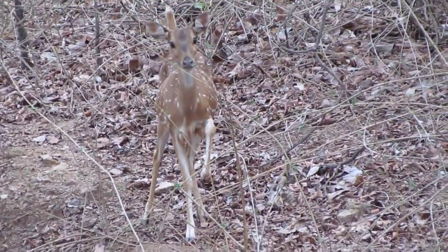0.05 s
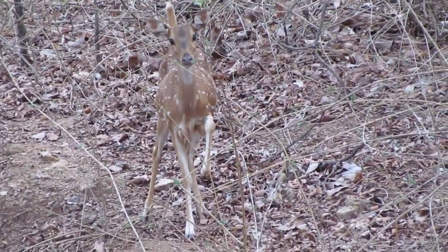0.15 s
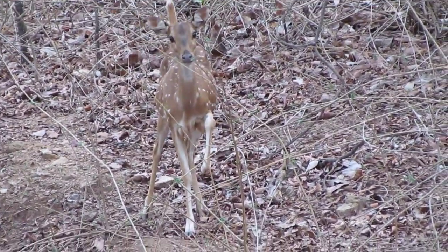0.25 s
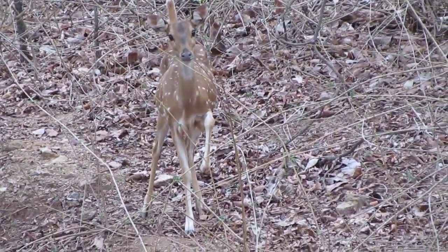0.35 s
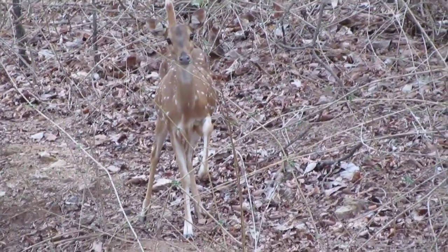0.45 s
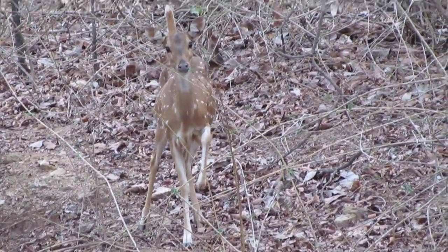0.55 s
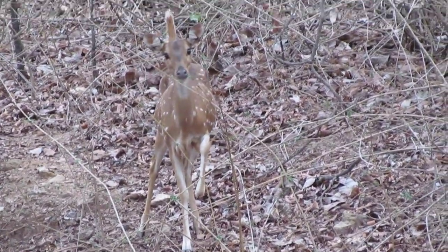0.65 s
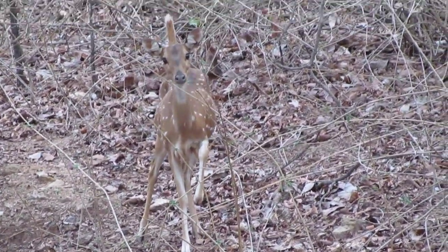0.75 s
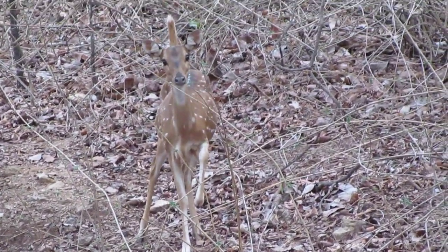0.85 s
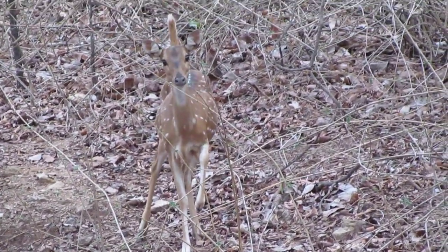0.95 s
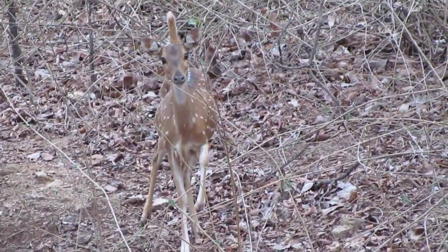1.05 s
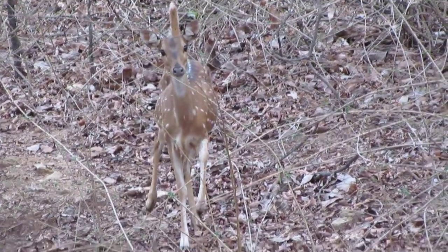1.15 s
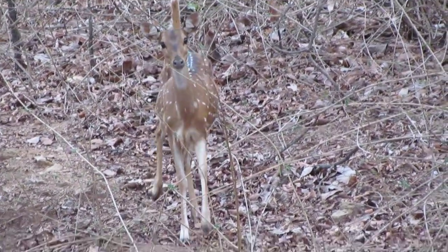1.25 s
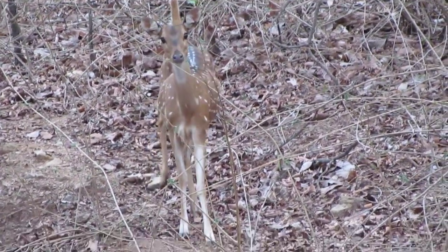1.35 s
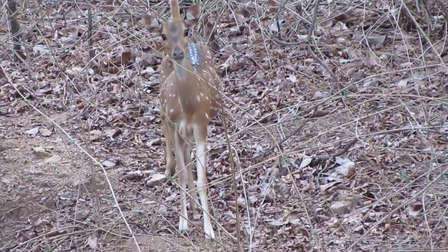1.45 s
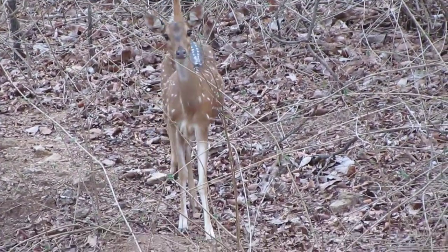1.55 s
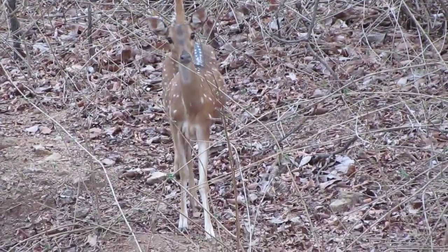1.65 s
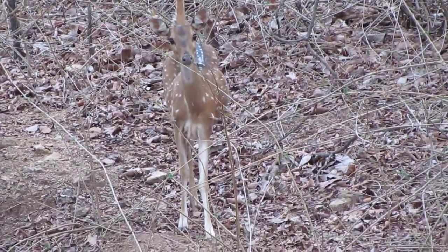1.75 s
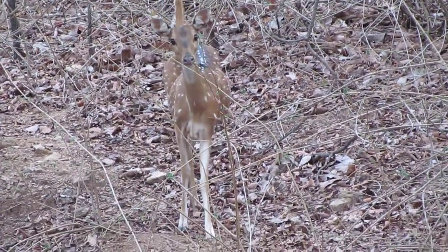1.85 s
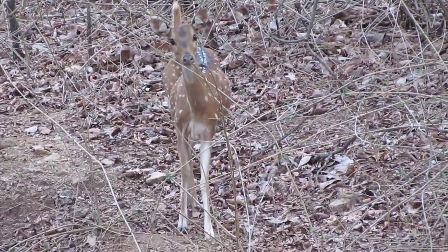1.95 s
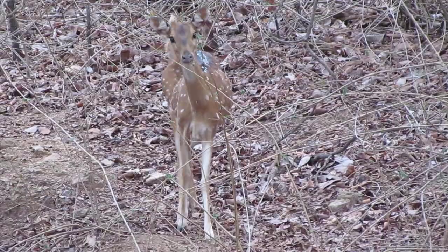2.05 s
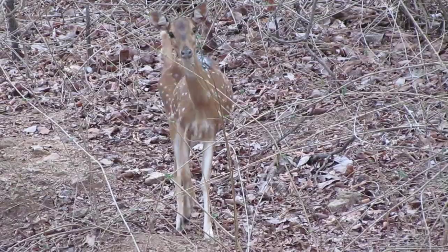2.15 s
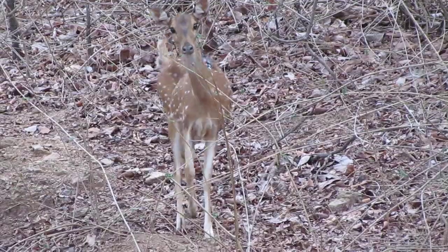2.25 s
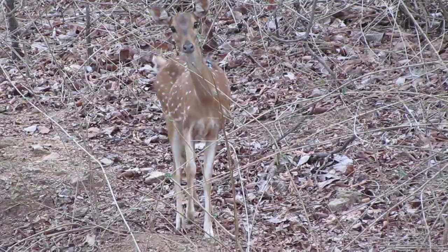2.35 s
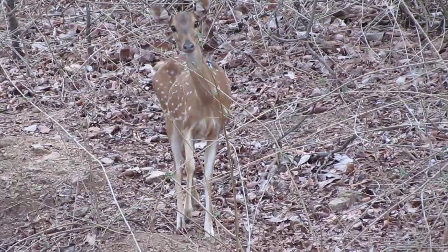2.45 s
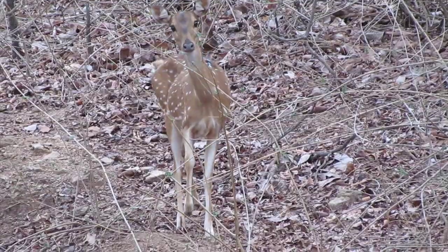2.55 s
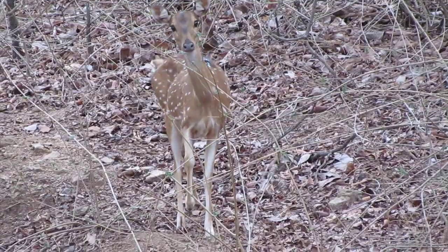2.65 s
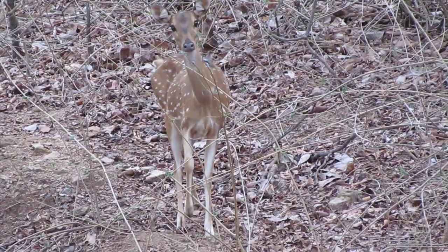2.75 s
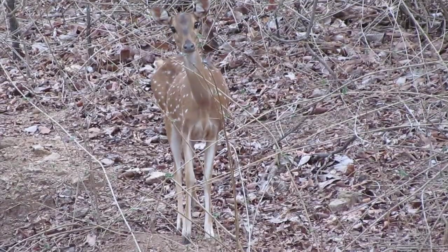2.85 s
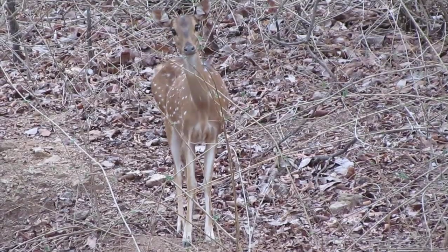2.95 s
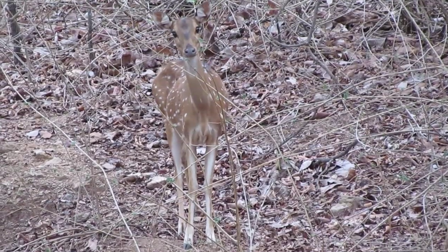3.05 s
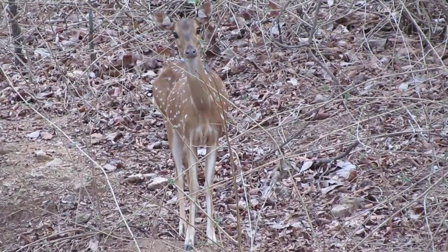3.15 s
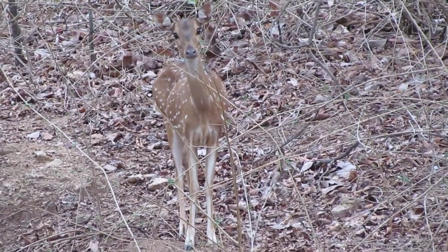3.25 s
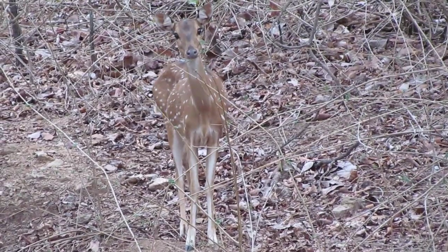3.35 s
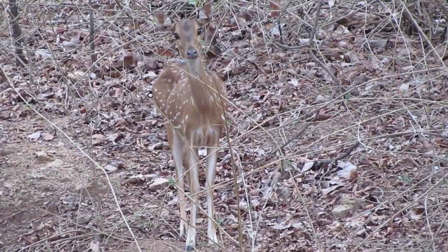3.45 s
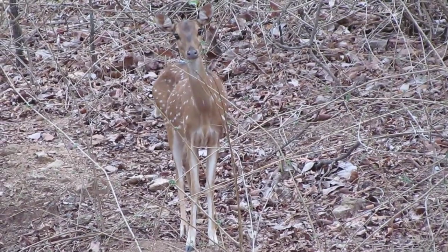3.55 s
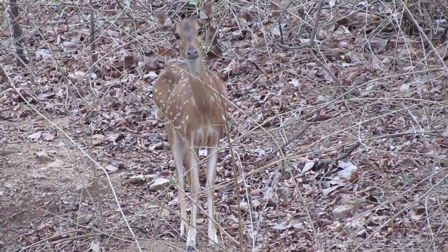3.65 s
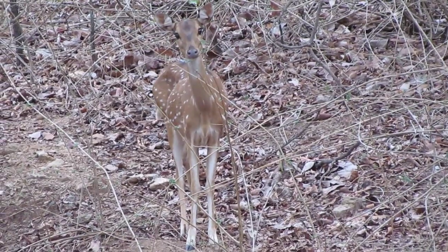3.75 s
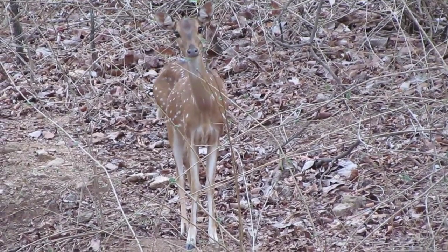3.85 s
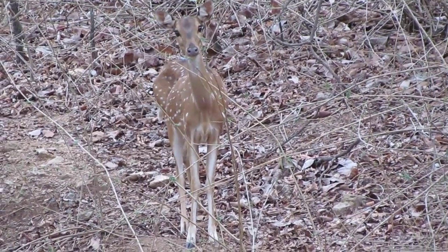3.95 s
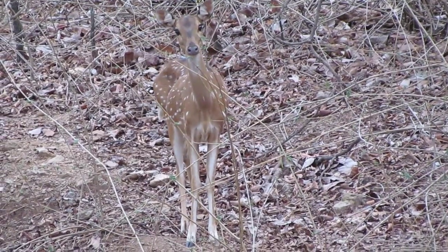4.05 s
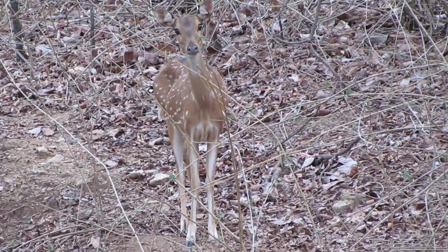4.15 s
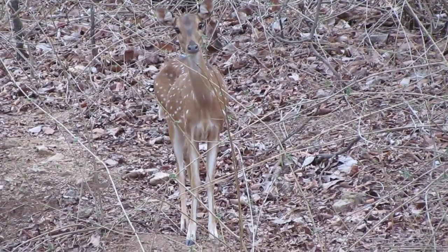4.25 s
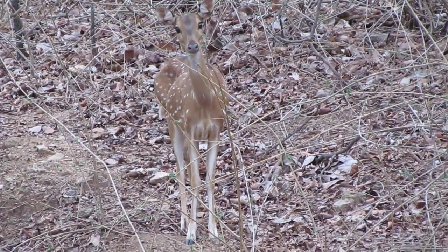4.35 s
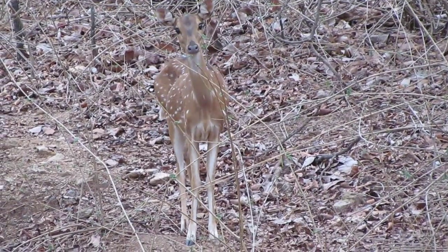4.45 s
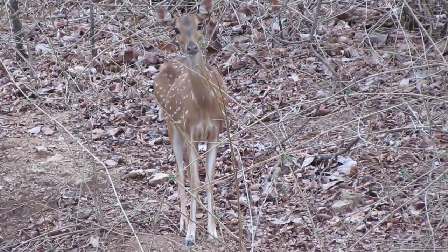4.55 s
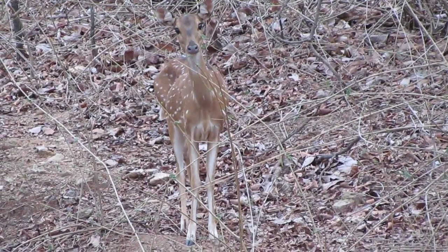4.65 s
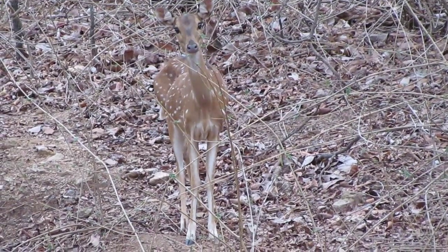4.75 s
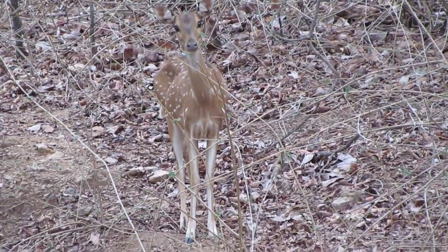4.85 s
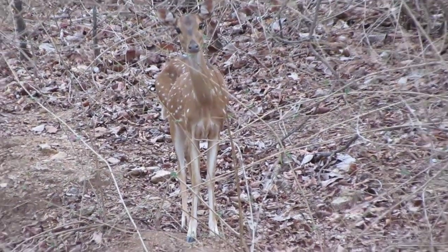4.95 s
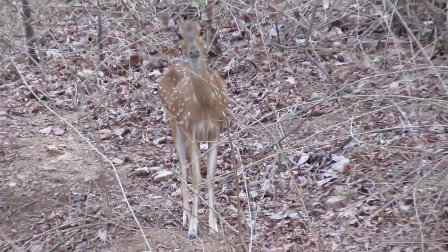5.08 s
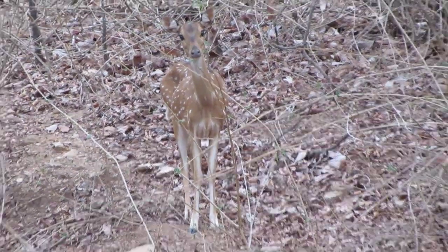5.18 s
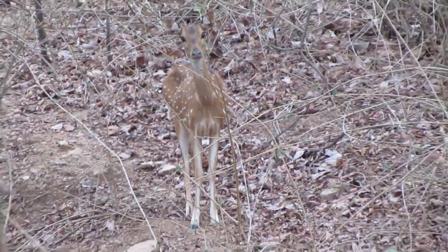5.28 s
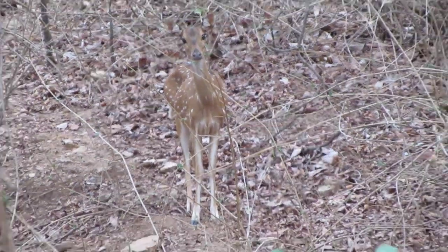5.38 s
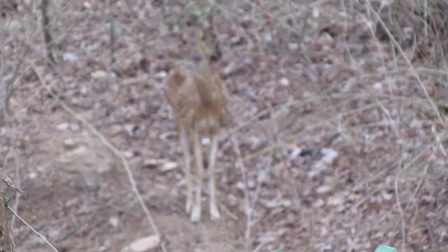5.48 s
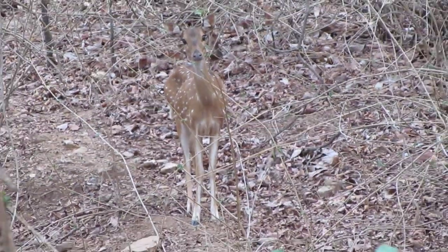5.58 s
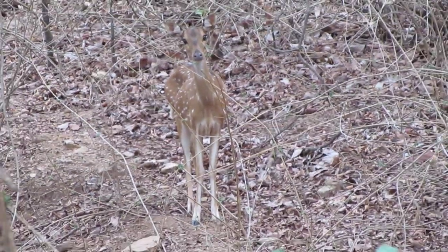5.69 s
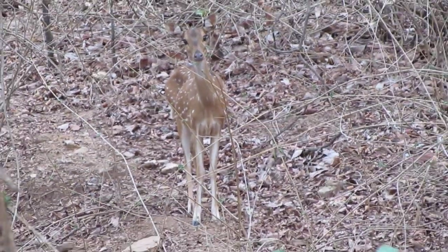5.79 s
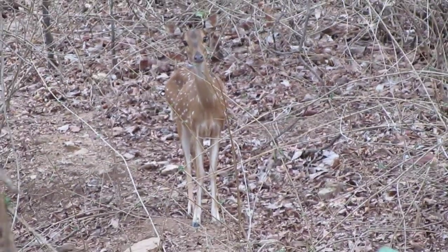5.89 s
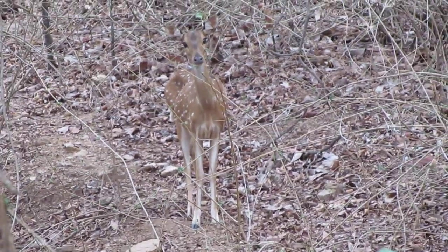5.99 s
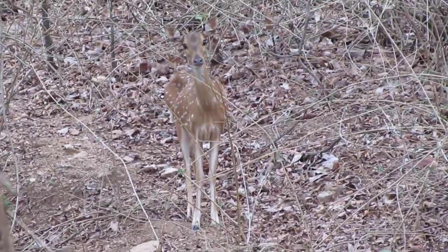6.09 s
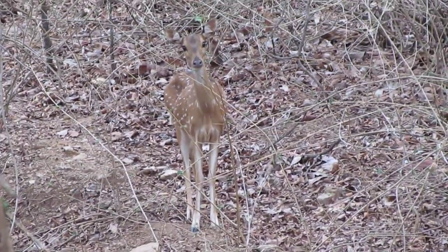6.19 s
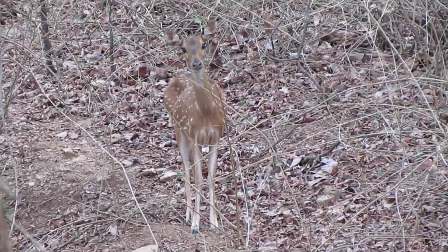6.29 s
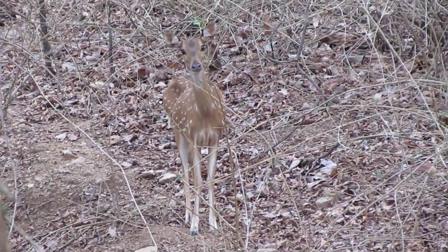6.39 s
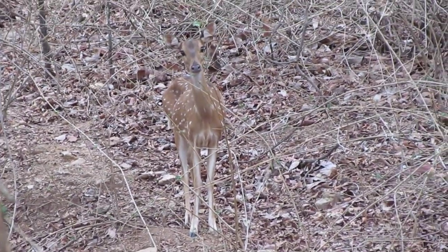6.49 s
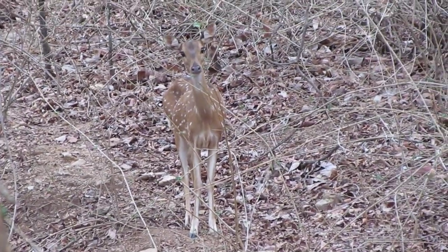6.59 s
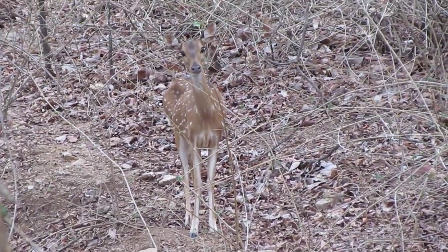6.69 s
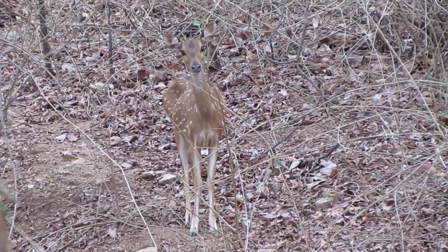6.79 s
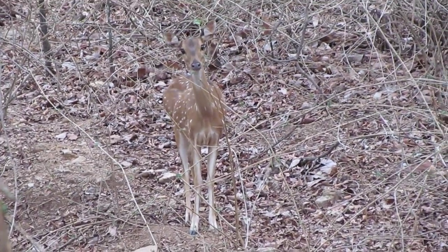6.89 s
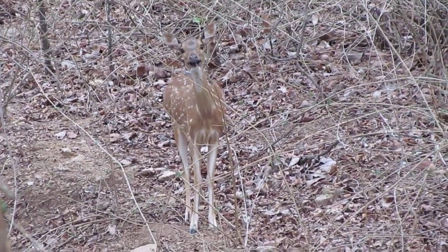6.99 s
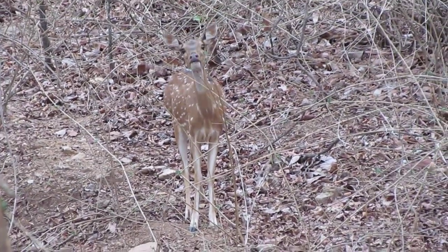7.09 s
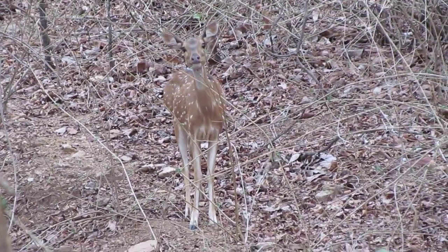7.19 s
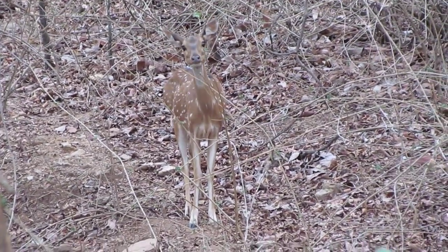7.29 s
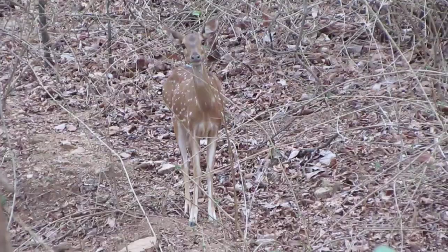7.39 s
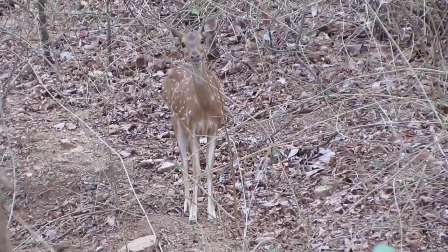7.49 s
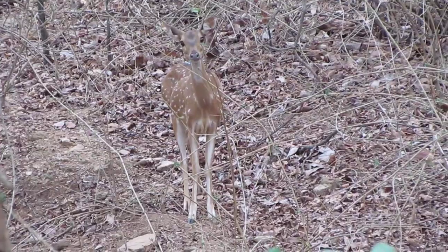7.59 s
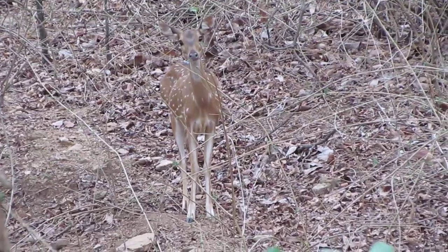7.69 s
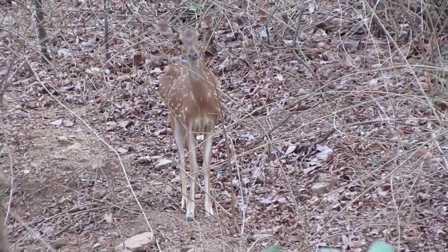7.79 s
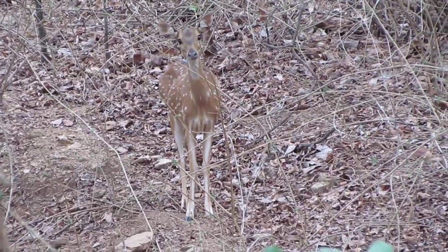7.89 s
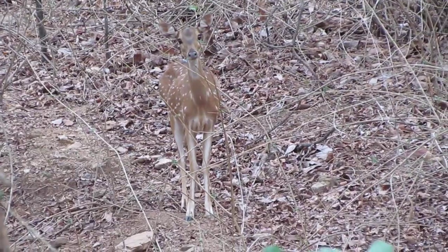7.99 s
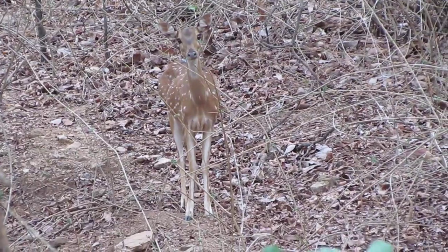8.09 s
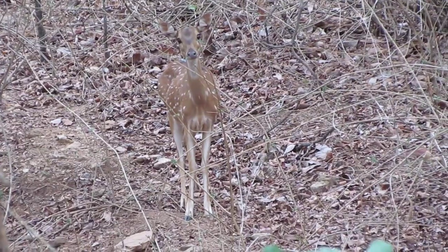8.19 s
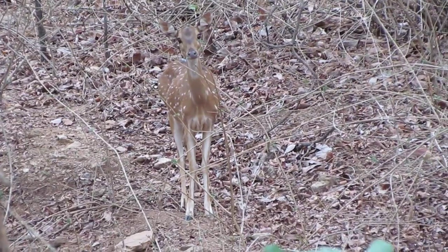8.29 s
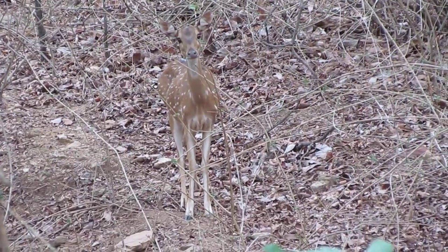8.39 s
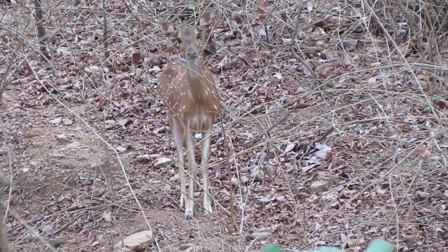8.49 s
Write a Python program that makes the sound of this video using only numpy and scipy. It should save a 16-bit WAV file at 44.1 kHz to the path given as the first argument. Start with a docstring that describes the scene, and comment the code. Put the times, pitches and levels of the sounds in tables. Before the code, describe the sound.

A soft, steady forest hush runs for about eight and a half seconds. A cricket chirps evenly about twice a second throughout, while a thin insect buzz comes and goes. A higher, faint bush cricket shuffles quickly from about 1.5 to 7 seconds. Distant birds give short gliding whistles between 1 and 3 seconds, with a few tiny dry leaf ticks. Just after 4 seconds come two soft, low bumps on the microphone, to the left. A hand knocks on its housing at about 4.8, 5.4 and 5.6 seconds, with a light grainy rub between. At about 7.1 seconds a deer gives one sharp, high alarm yelp, the loudest sound, very brief, turning hoarse as its pitch drops. The trees echo it for about a second. Bird chirps pick up around the call and continue until just after 8 seconds, over the insects.

```python
"""Deer alarm in a dry forest

A spotted deer gives one sharp yelp that breaks hoarse, and the trees throw it back for a second.
A cricket chirps twice a second, a bush cricket shuffles higher up, a thin insect buzz comes and goes,
far birds whistle. Close by, a hand knocks and rubs on a microphone's housing; a few dry leaves tick."""
import sys
import numpy as np
from scipy import signal
from scipy.fft import rfft, irfft
from scipy.io import wavfile

SR = 44100
rng = np.random.default_rng(int(sys.argv[2]) if len(sys.argv) > 2 else 0)


def log_audio(samples):
    """Write samples as a 16-bit WAV file to the path given in sys.argv[1]."""
    # one column per channel
    frames = np.atleast_2d(samples).T
    # limit to full scale, then quantise
    limited = np.clip(frames, -1, 1)
    pcm = np.round(limited * 32767).astype(np.int16)
    wavfile.write(sys.argv[1], SR, pcm)


N = 376173
TIME = np.arange(N) / SR


def deer():
    """Vocal folds squeal in a clean arch, then the voice breaks and turns hoarse as the pitch sags."""
    # The throat's response to overtones. Each row: frequency in Hz, level in dB against the octave.
    throat = [(2300, -24), (3400, -29.5), (4500, -37), (5700, -38), (6800, -40), (9000, -32), (11000, -29),
              (13000, -45)]
    # The colour of air rasping in the throat. Each row: frequency in Hz, relative level in dB.
    rasp_colour = [(500, -14), (1000, 4), (1900, 10), (3000, 3), (4200, -4.5), (5800, 8), (7800, -3),
                   (9000, 6), (11300, 9.5), (13000, -9.5), (15000, -30.5)]
    start_s, break_s, end_s = 7.068, 7.128, 7.21
    plateau_hz, scoop_hz, scoop_s, sag_hz_per_s = 1135, 160, .011, 4800
    swell_db_per_s, fade_db_per_s, octave_fade_db_per_s = 270, 155, 237
    until_break = np.maximum(break_s - TIME, 0)
    broken_s = np.minimum(since(break_s), end_s - break_s)
    hz = plateau_hz - scoop_hz * np.exp(-since(start_s) / scoop_s) - sag_hz_per_s * broken_s
    hoarse = np.minimum(17 * broken_s, .77)
    fundamental_gain = from_db(-21 - swell_db_per_s * until_break - fade_db_per_s * broken_s)
    fundamental_gain *= gate(start_s, end_s, attack=.0045, release=.028)
    octave_gain = from_db(-20.5 - octave_fade_db_per_s * broken_s)
    octave_gain *= gate(start_s, end_s, attack=.027, release=.02) ** 2
    # Slack folds beat unevenly, in both period and strength.
    hz *= 1 + (.003 + .07 * hoarse) * wander(TIME, 900)
    flutter = from_db(4 * hoarse * wander(TIME, 260) - 1.5 * hoarse)
    fundamental = flutter * fundamental_gain * tone(hz)
    octave = flutter * octave_gain * tone(2 * hz + 170 * hoarse * wander(TIME, 1200))
    overtones = octave_gain * sum(from_db(curve(throat, k * hz)) * tone(k * hz) for k in range(3, 12))
    # Air escapes once in each cycle of the folds.
    rasp_gain = from_db(-43 + 2.3 * wander(TIME, 370)) * gate(start_s, end_s, attack=.022, release=.06)
    rasp = rasp_gain * noise(rasp_colour) * (1 + .47 * tone(hz))
    whistle = deer_whistle(hz, start_s=7.077, end_s=break_s + .006)
    edge = (overtones + whistle) * (1 + .36 * wander(TIME, 400)) + rasp
    direct = pan(fundamental, 1) + pan(octave + edge, -6)
    # The squeal is beamed straight ahead; the lower, hoarse end spreads wider among the trees.
    spread = (fundamental + octave) * from_db(-1.5 + 3 * hoarse)
    echoes = forest(spread, gap=.023, near_db=-5, near_t60=.46,
                    far_db=-11, far_t60=2.68, dull_hz=3500, alike=.5)
    bright_echoes = forest(edge, gap=.006, near_db=-9, near_t60=.22,
                           far_db=-11, far_t60=.6, dull_hz=6000, alike=.1)
    return direct + echoes + bright_echoes


def deer_whistle(fold_hz, start_s, end_s):
    """A thin second voice drops onto its pitch; the folds chop it, adding a sideband on either side."""
    settled_hz, drop_hz, drop_s = 8790, 850, .0129
    hz = settled_hz + drop_hz * np.exp(-since(start_s) / drop_s)
    gain = from_db(-35.5) * gate(start_s, end_s, attack=.009, release=.011)
    return gain * tone(hz + 70 * wander(TIME, 720)) * (1 + .41 * tone(fold_hz))


def cricket():
    """Each wing stroke is a short falling tone; the strokes quicken and fall farther through a chirp."""
    # The chirps. Each row: start in seconds, relative level in dB.
    chirps = [(.151, -45), (.689, -44.5), (1.226, -45.5), (1.765, -45), (2.335, -44.5), (2.838, -44),
              (3.348, -44), (3.893, -45), (4.389, -43.5), (4.919, -43.5), (5.462, -44.5), (6.033, -42.5),
              (6.615, -44.5), (7.186, -45), (7.721, -44.5), (8.241, -46)]
    chirp_s, swell_s, release_s = .26, .032, .055
    t = TIME[:int(chirp_s * SR)]
    strokes_per_s = np.interp(t, [.09, .12], [66, 107])
    fall_hz = np.interp(t, [0, .12], [560, 1050])
    wing_hz = 4700 + 550 * t
    swell_db = -14 * (np.exp(-t / swell_s) + np.maximum(1 - (chirp_s - t) / release_s, 0))
    song = np.zeros(N)
    for start, db in chirps:
        stroke = np.cumsum(strokes_per_s * (1 + .06 * wander(t, 41.8))) / SR % 1
        grip = np.sin(np.pi * stroke) ** 2.2
        # The teeth of the file catch unevenly.
        hz = wing_hz + fall_hz * (.5 - stroke) + 120 * wander(t, 900)
        catch_db = 2.8 + 1.8 * wander(t, 100) + 2.1 * wander(t, 600)
        add(song, start, from_db(db + swell_db + catch_db) * grip * tone(hz))
    song = band(song, 4400, 5300)  # the wing's resonance
    echoes = forest(song, gap=.002, near_db=-3.5, near_t60=.08,
                    far_db=-7, far_t60=.55, dull_hz=9000, alike=.1)
    return pan(song, 3) + echoes


def birds():
    """Gliding whistles, some harsh, heard through much wood."""
    # The bird notes. Each row: start in seconds, length in seconds, first and last pitch in Hz,
    # level in dB, left over right in dB, roughness from 0 to 1.
    notes = [(1.026, .12, 1900, 1580, -59, 0, .65), (1.253, 0.062, 3120, 2950, -45, 15, .25),
             (1.268, .09, 2650, 2700, -55, 12, 0.43), (1.285, .11, 2950, 2944, -41, 4, .12),
             (1.464, 0.091, 2100, 2457, -45.5, 6, 0.64), (1.538, .1, 2350, 2430, -44, 0, 0.59),
             (1.77, 0.14, 2280, 2450, -49.5, 2.5, 0.74), (1.87, .085, 2870, 3010, -43, 4, 0.18),
             (2.093, .07, 1880, 1884, -53.5, -4, .18), (2.171, 0.07, 2300, 2064, -49, 5, .4),
             (2.225, 0.064, 1810, 1670, -52.5, 6.5, 0.27), (2.28, .14, 2000, 2130, -54, 2.5, 0.65),
             (2.89, .138, 1797, 1730, -45.5, -6, 0.09), (3.294, .12, 2260, 1650, -62, -2.5, .7),
             (4.448, .092, 2950, 2600, -60.5, 7, .7), (4.593, .063, 2692, 2545, -58, 5, .35),
             (4.805, 0.09, 3000, 2630, -58.5, 8.5, 0.27), (4.987, 0.098, 2860, 2820, -60, 11, 0.41),
             (6.876, .17, 2646, 2890, -48.5, 4, .2), (7.102, .094, 3000, 2900, -43, 14, .15),
             (7.193, 0.052, 2920, 2920, -41, -2, 0.12), (7.32, .07, 2400, 2520, -44, 8, .5),
             (7.37, .084, 2750, 3150, -53, 7, 0.75), (7.391, 0.049, 2360, 2520, -42, 1, .38),
             (7.459, .11, 1705, 1800, -44.5, -5, .13), (7.614, .037, 2650, 2696, -40, 7, 0.16),
             (7.82, 0.05, 1494, 2600, -45, -3.5, .47), (7.861, .05, 2550, 2296, -43, 3, 0.54),
             (7.939, .054, 2150, 1857, -46, -4, .6), (8.001, .028, 2570, 2670, -38.5, 10, 0.07),
             (8.04, 0.051, 2370, 2327, -39, -11, 0.11), (8.09, 0.065, 2283, 2140, -47.5, -3, .19)]
    direct, song = np.zeros((2, N)), np.zeros(N)
    for start, length, first_hz, last_hz, db, side_db, rough in notes + far_notes():
        t = TIME[:int(length * SR)]
        progress = t / t[-1]
        glide = last_hz + (first_hz - last_hz) * (1 - progress) ** 1.8  # fast at first, then settling
        hz = glide * (1 + .13 * rough * wander(t, 650))
        swell = np.abs(np.sin(np.pi * progress)) ** .8 * from_db(4 * rough * wander(t, 180))
        note = from_db(db) * swell * tone(hz)
        add(direct, start, pan(note, side_db))
        add(song, start, note)
    return direct + forest(song, gap=.012, near_db=-6, near_t60=.27,
                           far_db=-3, far_t60=1.65, dull_hz=5030, alike=.2)


def far_notes(per_s=2.5, low_hz=2200, high_hz=3403, length_s=.13, db=-65, side_db=5, rough=.6):
    """Rows of faint falling notes for farther birds, at random times and pitches."""
    notes = rng.uniform([0, low_hz], [N / SR, high_hz], (int(per_s * N / SR), 2))
    return [(start, length_s, hz, .87 * hz, db, side_db, rough) for start, hz in notes]


def hand_knocks():
    """Each knock cracks and rings the housing, favouring the modes near the pitch of the touch."""
    # The knocks. Each row: start in seconds, relative level in dB, ring time multiplier,
    # frequency most excited by the touch in Hz.
    knocks = [(4.8471, -28.5, 0.91, 700), (5.429, -24, 0.71, 1600), (5.59, -22.5, 1.57, 1050)]
    # The housing's modes. Each row: frequency in Hz, relative level in dB, seconds to fall 60 dB.
    modes = [(146, -7.5, .05), (281, -5, .06), (467, -9.5, 0.088), (690, -13.5, 0.023), (995, -6, 0.023),
             (1240, -8.5, .03), (1650, -8.5, 0.024), (1904, -7, 0.025), (2200, -8.5, 0.026),
             (2840, -11.5, 0.017)]
    out, t = np.zeros(N), TIME[:SR // 5]
    attack = 1 - np.exp(-t / .00049)
    for start, db, ring, touch_hz in knocks:
        body = np.zeros(len(t))
        for k, (hz, mode_db, t60) in enumerate(modes):
            struck_db = mode_db - 3.7 * abs(np.log2(hz / touch_hz))
            body += (-1) ** k * from_db(struck_db - 60 * t / (t60 * ring)) * np.sin(2 * np.pi * hz * t)
        crack = band(rng.standard_normal(len(t)), 900, 8000) * from_db(-7 - 60 * t / .018)
        add(out, start, from_db(db) * (body + crack) * attack)
    return pan(out, .61)


def hand_bumps():
    """Soft bumps rock the housing: low thuds, well to the left."""
    # The bumps. Each row: centre in seconds, frequency in Hz, level in dB, half-width in seconds.
    bumps = [(.345, 53.6, -49.5, 0.016), (.83, 45, -46, 0.019), (.885, 60, -45, 0.011),
             (4.224, 81, -34, 0.0082), (4.312, 66.2, -32.5, 0.0058), (5.77, 49, -47, .025)]
    thuds = np.zeros(N)
    for centre, hz, db, width in bumps:
        t = TIME - centre
        thuds += from_db(db) * np.exp(-(t / width) ** 2) * np.cos(2 * np.pi * hz * t)
    return pan(thuds, 14.4)


def hand_rub():
    """The hand slides over the housing with a grainy hiss."""
    # The rub's swell. Each row: time in seconds, level in dB.
    swell = [(4.7, -80), (4.87, -61), (5.18, -55), (5.26, -49.5), (5.39, -51.5), (5.46, -58), (5.62, -59),
             (5.85, -80)]
    # The rub's colour. Each row: frequency in Hz, relative level in dB.
    colour = [(150, -2), (400, 4), (800, -3.5), (1400, -5.5), (2200, -8.5), (4000, -9), (7000, -13),
              (12000, -20.5), (15000, -35)]
    grain_db = 1.3 * wander(TIME, 70) + 1.8 * wander(TIME, 700)
    return pan(from_db(curve(swell, TIME) + grain_db) * noise(colour), .61)


def leaves():
    """Dry leaves snap with tiny bright ticks."""
    # The ticks. Each row: start in seconds, level before filtering in dB, pitch of the band in Hz.
    ticks = [(1.444, -37, 10400), (1.567, -43, 10500), (1.843, -37.5, 10490), (2.016, -31, 3400),
             (4.545, -40, 11000), (6.465, -48, 11000)]
    out, t = np.zeros(N), TIME[:SR // 20]
    for start, db, hz in ticks:
        snap = rng.standard_normal(len(t)) * from_db(db - 60 * t / .012)
        add(out, start, band(snap, hz * .84, hz * 1.12))
    return pan(out, -2)


def bush_cricket():
    """Short phrases of quick downward scrapes, over the blurred hiss of others farther off."""
    # The singer's pace. Each row: time in seconds, phrases per second.
    tempo = [(1.5, 8.39), (3, 8.07), (4, 8.26), (6.9, 7.4)]
    # The singer's effort. Each row: time in seconds, relative level in dB.
    effort = [(0, -83), (1.4, -60.5), (6.7, -60.5), (6.95, -73), (8, -74), (8.53, -67)]
    strokes_per_s, wing_hz, fall_hz = 123, 8900, 1300
    phrase = (.365 + np.cumsum(curve(tempo, TIME)) / SR) % 1  # opens part way through a phrase
    swell = np.clip(np.sin(np.pi * phrase) * 1.56, .5, 1) ** 2
    stroke = np.cumsum(strokes_per_s * (1 + .036 * wander(TIME, 30))) / SR % 1
    hz = wing_hz + fall_hz * (.5 - stroke) + 220 * wander(TIME, 2500)
    scrape = tone(hz) * np.sin(np.pi * stroke) ** 2
    song = from_db(curve(effort, TIME) - 3.5 + 1.2 * wander(TIME, 100)) * rms_one(swell * scrape)
    echoes = forest(song, gap=.002, near_db=-3, near_t60=.06,
                    far_db=-5, far_t60=.4, dull_hz=12000, alike=0)
    others = from_db(-68.5) * rms_one(band(rng.standard_normal((2, N)), 8600, 9100))
    return pan(song + echoes + others, -2.1)


def insect_buzz():
    """A far insect's narrow hiss, growing slowly and stopping short."""
    # The buzzes. Each row: start in seconds, end in seconds, fullest level in dB.
    buzzes = [(-.3, .12, -64.5), (.65, 1.28, -67.5), (1.798, 2.48, -65), (2.981, 3.66, -67),
              (4.201, 4.85, -68), (5.4, 6.025, -68), (6.7, 7.304, -67), (8.047, 8.52, -67)]
    gain = sum(from_db(db) * np.interp(TIME, [on - .1, on + .13, off - .05, off + .05], [0, .84, 1, 0])
               for on, off, db in buzzes)
    hiss = rms_one(band(rng.standard_normal((2, N)), 7050, 7500))
    return pan(gain * hiss, -2)


def forest(x, gap, near_db, near_t60, far_db, far_t60, dull_hz, alike):
    """Echoes only, gap seconds late: near trunks scatter briefly, deep wood answers long and dull."""
    t = TIME[:2 * SR]
    mid, side = rng.standard_normal((2, 2, 1, len(t)))
    near, far = np.sqrt((1 + alike) / 2) * mid + np.sqrt((1 - alike) / 2) * side * [[1], [-1]]
    near = rms_one(near * from_db(-60 * t / near_t60))
    far = band(rms_one(far * from_db(-60 * t / far_t60)), 220, dull_hz)
    response = (from_db(near_db) * near + from_db(far_db) * far) / np.sqrt(len(t))
    out = np.zeros((2, N))
    add(out, gap, signal.fftconvolve(x[None], response, axes=1))
    return out


def air(level_db):
    """The soft, steady hush of the forest: a wide bed whose rumble leans left."""
    # The hush's colour. Each row: frequency in Hz, relative level in dB.
    colour = [(20, -7), (50, -1), (100, -4), (200, -5.5), (400, -10.5), (800, -14.5), (1400, -19),
              (2400, -17), (3800, -24.5), (6500, -25), (8800, -27), (10500, -29), (13000, -34),
              (15700, -38.5)]
    # How alike the two ears are. Each row: frequency in Hz, correlation from -1 to 1.
    likeness = [(60, -0.04), (125, 0.3), (250, 0), (600, 0.26), (2000, 0.13), (5000, 0.08), (12000, -0.28)]
    # Where the hush leans. Each row: frequency in Hz, left over right in dB.
    balance = [(50, 5), (125, 1.5), (300, 2.5), (2000, 0), (4000, 1.5), (6500, 0), (11000, -1)]
    mid, side = rfft(rng.standard_normal((2, N)))
    alike, ears = per_bin(likeness), np.array([[1], [-1]])
    spectrum = np.sqrt(1 + alike) * mid + np.sqrt(1 - alike) * side * ears
    spectrum *= from_db(per_bin(colour) + ears * per_bin(balance) / 2)
    return from_db(level_db) * rms_one(irfft(spectrum, N))


def from_db(db):
    """Decibels to gain."""
    return 10 ** (np.asarray(db) / 20)


def rms_one(x):
    """Scale to rms 1."""
    return x / np.sqrt(np.mean(x ** 2) + 1e-20)


def curve(rows, at):
    """Read a two-column table along straight lines."""
    return np.interp(at, *np.transpose(rows))


def per_bin(points):
    """A table over log frequency, read at every spectral bin."""
    hz, value = np.transpose(points)
    return np.interp(np.log(np.fft.rfftfreq(N, 1 / SR) + 1), np.log(hz), value)


def noise(colour):
    """Noise of a given colour, rms 1."""
    return rms_one(irfft(rfft(rng.standard_normal(N)) * from_db(per_bin(colour)), N))


def wander(t, rate):
    """Random drift with rate turns a second, spread about 1."""
    position = (t - t[0]) * rate
    count = int(position[-1]) + 2
    return np.interp(position, np.arange(count), rng.standard_normal(count))


def band(x, low_hz, high_hz):
    """Band-pass."""
    return signal.sosfilt(signal.butter(2, [low_hz, high_hz], "band", fs=SR, output="sos"), x)


def tone(hz):
    """A sine of rms 1 that follows a pitch."""
    return np.sqrt(2) * np.sin(2 * np.pi * np.cumsum(hz) / SR)


def gate(start, end, attack, release):
    """Smooth attack, hold, smooth release; times in seconds."""
    rise, fall = np.clip((TIME - start) / attack, 0, 1), np.clip((end - TIME) / release, 0, 1)
    return (np.sin(np.pi / 2 * rise) * np.sin(np.pi / 2 * fall)) ** 2


def since(moment):
    """Seconds gone by since a moment, zero before it."""
    return np.maximum(TIME - moment, 0)


def pan(x, side_db):
    """Place a sound by its level left over right."""
    return x * from_db(np.array([[side_db], [-side_db]]) / 2)


def add(out, start_s, x):
    """Mix x into out from start_s on."""
    i = round(start_s * SR)
    out[..., i:i + x.shape[-1]] += x[..., :max(N - i, 0)]


def scene():
    """The yelp among insects and birds, with the hand and leaves up close and the hush beneath."""
    animals = deer() + cricket() + bush_cricket() + insect_buzz() + birds()
    hand = hand_knocks() + hand_bumps() + hand_rub()
    return animals + hand + leaves() + air(level_db=-50.5)


def record(dry, cutoff_hz=15700):
    """A steep low-pass takes off the very top."""
    return signal.sosfilt(signal.ellip(12, .1, 90, cutoff_hz, fs=SR, output="sos"), dry)


dry = scene()
out = record(dry)
log_audio(out)
```